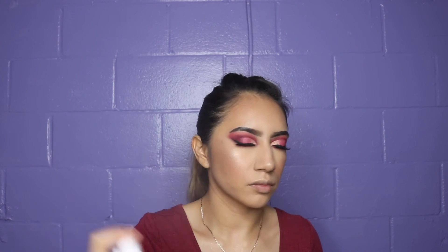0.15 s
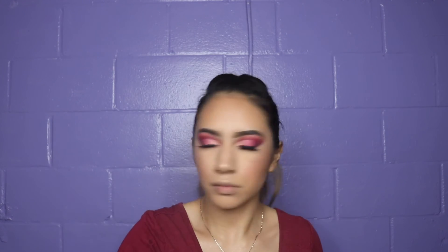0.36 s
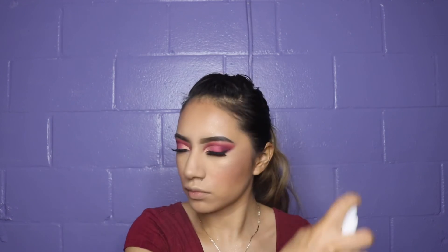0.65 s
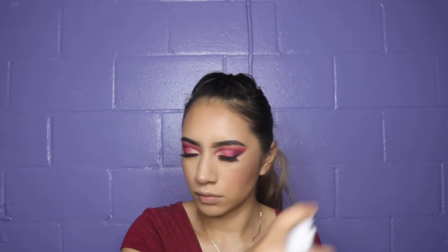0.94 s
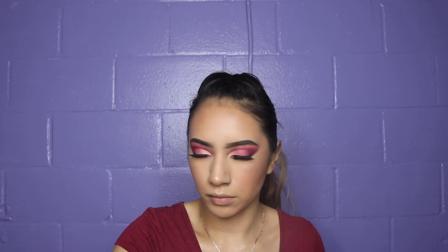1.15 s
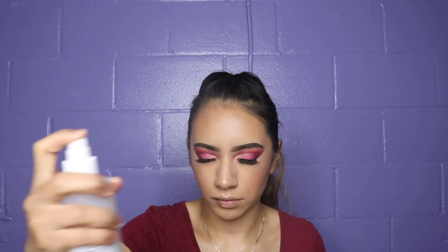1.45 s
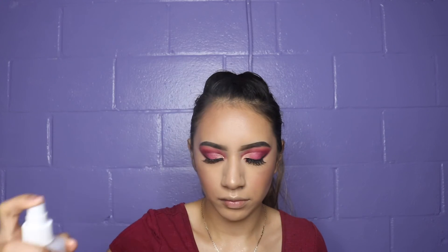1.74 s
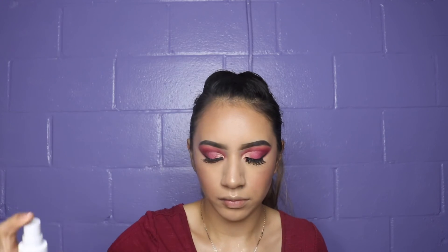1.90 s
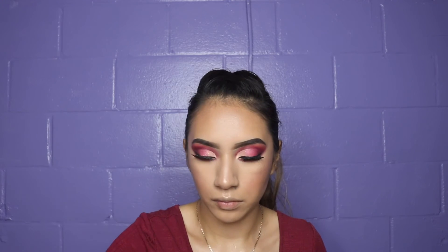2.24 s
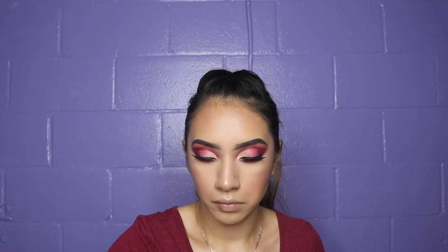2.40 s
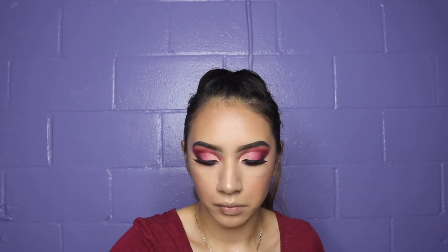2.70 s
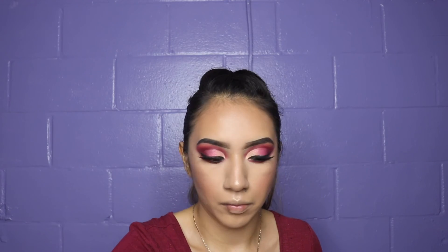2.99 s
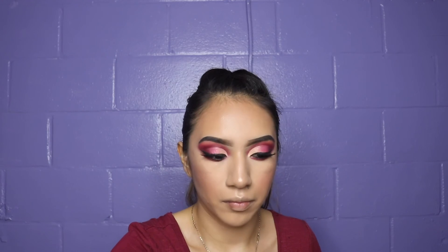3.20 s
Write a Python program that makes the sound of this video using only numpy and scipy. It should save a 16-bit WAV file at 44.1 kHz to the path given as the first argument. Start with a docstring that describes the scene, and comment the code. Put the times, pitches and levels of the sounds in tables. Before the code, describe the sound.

A small plastic spray bottle is pumped about four times a second from 0 to 1.9 s: light plunger ticks, a hollow clack, then a very short, bright hiss of mist, eight puffs in all, the first faint. From 2.0 to 2.6 s only faint taps and soft rustling. At 3.13 s the bottle lands on a table with a woody, briefly ringing knock. Close stereo, hard-walled room, faint steady appliance hum.

```python
"""A hard-walled room, close to a stereo microphone: a small pump bottle is worked about four times a second.
In each stroke the plunger ticks, the pump clacks, and the nozzle lets out a short hiss of mist.
Mist is coloured noise; clacks and ticks are short plastic rings with a noisy rattle.
After light taps and a soft rustle the bottle is set down with a knock that rings the table's modes.
An appliance hum of wavering sines and a faint noise bed run throughout."""
import sys
import numpy as np
from scipy import signal
from scipy.fft import rfft, irfft, next_fast_len
from scipy.io import wavfile
from scipy.ndimage import uniform_filter1d

SR = 44100
rng = np.random.default_rng(int(sys.argv[2]) if len(sys.argv) > 2 else 0)


def digitize_waveform(pressure):
    """Quantize a signal to 16-bit integers and store it at the path in sys.argv[1].

    Rows of a 2-D input are taken as channels; values are limited to [-1, 1].
    """
    field = np.atleast_2d(pressure).T
    bounded = np.clip(field, -1, 1)
    quanta = np.round(bounded * 32767).astype(np.int16)
    wavfile.write(sys.argv[1], SR, quanta)


N = 147735

# puffs of mist: start_s, attack_s, length_s (attack included), level_db, tilt_db_per_octave,
# left_minus_right_db, left_late_ms, nozzle_ring_db (relative to the puff)
PUFFS = [(-.03, .018, 0.054, -39, 4, 0.5, -.06, -15), (0.214, 0.0098, 0.031, -32.5, 3, -0.3, -0.071, -8),
         (0.46, 0.027, .032, -33, 2.5, -0.5, 0.029, -9.5), (0.736, 0.021, 0.026, -35.5, 3, -1, 0.071, -4),
         (.962, 0.015, 0.032, -33.5, 3.1, -1, 0.056, -4.5),
         (1.233, .011, 0.022, -32.5, 2.4, -1, -0.021, -8), (1.446, .014, 0.025, -31, 3, 1.5, -0.059, -5),
         (1.688, .019, 0.03, -31.5, 2.9, 2.5, -0.1, -1)]
# colour of the jet's hiss: pitch_hz, level_db
MIST_COLOUR = [(200, -32), (700, -2.5), (1300, 3.5), (2200, 8), (3100, 5.5), (4000, 4), (5100, -0.5),
               (6700, -1), (9800, -3.5), (11400, -10.5), (12200, -10), (14000, -14), (16000, -17.5)]
# ring of the nozzle: pitch_hz, level_db
NOZZLE_COLOUR = [(3500, -19), (5200, -13), (5650, 0), (6100, -4), (6600, -12), (9000, -43)]
# duller rush while pressure builds: pitch_hz, level_db
RUSH_COLOUR = [(200, -28), (600, -4), (1400, 7.5), (2600, -36.5), (4000, -2.5), (12000, -5)]
# pump clacks as the plunger is pressed: start_s, level_db, tilt_db_per_octave, left_minus_right_db, left_late_ms
CLACKS = [(0.1906, -31.5, 0, -2.5, -0.076), (.4407, -28.5, 3, -4, -0.012), (0.7126, -27, 0.5, -3, .06),
          (0.9345, -30, -0.5, -2.5, 0.074), (1.185, -30, 0.5, -2, 0.045), (1.4126, -30, 0.5, -0.5, -0.07),
          (1.6577, -31.5, 0, -1.4, -0.092)]
# ring of the pump head: pitch_hz, level_db
CLACK_COLOUR = [(100, -31.5), (300, -2), (520, -8), (680, 0), (820, -5), (1500, -1), (1850, -5), (2500, 5),
                (2850, -2), (3250, -12), (4300, -11.5), (5000, -18), (5700, -14), (6700, -32.5),
                (15000, -46)]
# plunger ticks as the spring returns and the finger takes up the slack: start_s, level_db, tilt_db_per_octave
TICKS = [(.073, -39, -1.5), (.105, -39, -0.5), (.141, -37.5, 1.5), (.181, -42.5, 0.5), (0.3265, -42, 1.5),
         (0.354, -39, 1.5), (.381, -36.5, 3), (.391, -40.5, -1), (0.4309, -35.5, 0), (0.5754, -40.5, 2),
         (0.608, -39, 1), (0.6303, -35.5, 1), (.639, -35, 3), (.702, -39.5, 3), (.834, -43.5, 1.5),
         (0.865, -41, 1.5), (.888, -38, 1.5), (.926, -46, 2.5), (1.0753, -41, 2), (1.112, -38, 1),
         (1.1363, -36, .5), (1.175, -43, -2), (1.3421, -38, 1.5), (1.365, -35, 2.5), (1.375, -41.5, 9),
         (1.404, -42.5, -2), (1.556, -47, 1.5), (1.59, -37.5, 0.5), (1.620, -39.5, -0.5), (1.649, -44, 0),
         (1.805, -48, -0.5), (1.843, -38.5, 0), (1.872, -38.5, 0.5), (1.881, -43, 4.5),
         (1.897, -47.5, 11.5)]
# ring of the bottle under a tick: pitch_hz, level_db
TICK_COLOUR = [(100, -18.5), (320, 7), (420, 3), (560, 3), (680, 5.5), (820, 2), (1100, -3), (1600, -1),
               (1950, -4.5), (2650, -3), (3400, -19.5), (4600, -17.5), (5700, -13.5), (6800, -23),
               (15000, -45)]
# small handling taps: start_s, level_db, pitch_hz
TAPS = [(2.007, -48, 880), (2.099, -47, 2350), (2.105, -47.5, 2350), (2.107, -49, 3350), (2.33, -50, 1230)]
# soft rustles: start_s, length_s, level_db, left_minus_right_db, tilt_db_per_octave
RUSTLES = [(2.08, 0.046, -54, -12.5, 2), (2.139, 0.17, -54, -7, 4.5), (2.314, 0.073, -56, -4, -1),
           (2.412, 0.15, -60, -2, 4), (3.316, 0.1, -56, 8, 8)]
# colour of the rustle: pitch_hz, level_db
RUSTLE_COLOUR = [(400, 8), (2300, 15), (4000, 7), (7000, 5.5), (10000, 1), (15000, -19)]
# contacts of the bottle set down on the table: start_s, crack_db, thump_db (both relative)
KNOCKS = [(3.134, 1, 0), (3.1395, -8, -11.5), (3.1447, -14, -1)]
# modes of table and bottle: pitch_hz, level_db, t60_s
TABLE_MODES = [(176.2, -33.5, 0.37), (188, -32.5, 0.21), (279.8, -23.5, 0.19), (301, -33, 0.095),
               (436.6, -33.5, 0.35), (547, -42, 0.24), (593, -37, 0.34), (705, -51, .2), (978, -37.5, 0.4),
               (1092, -40.5, 0.35), (1580, -52.5, 0.37), (2680, -50, 0.13), (3100, -34, 0.049),
               (5394, -48, 0.1), (7780, -46, 0.071)]
# colour of the landing crack: pitch_hz, level_db
CRACK_COLOUR = [(25, -39), (60, -4), (200, 6.5), (500, 5), (800, 4.5), (1400, -5.5), (2600, -1.5),
                (3200, -1.5), (3750, -10), (5300, -7), (6400, -15), (7900, -15), (9200, -23), (15000, -41)]
# delay of the table-top echo, before the hand's sway: left_s, right_s
ECHO_S = [.0044, .0042]
# reverberation: pitch_hz, t60_s, level_db
ROOM = [(150, 0.58, 2), (493, 0.3, 1), (1470, 0.54, 2.5), (3700, .38, 1), (8200, 0.3, 3.5), (15800, .25, 2)]
# stereo width of room tone and reverberation: pitch_hz, side_minus_mid_db
WIDTH = [(60, -8), (300, -5.5), (800, -6), (2000, 0), (15000, 1)]
# appliance hum lines: pitch_hz, level_db
HUM = [(58.4, -58), (93.5, -66), (118.3, -69), (236, -68.5), (351.5, -56.5), (411, -68.5), (474, -67)]
# colour of the room tone: pitch_hz, level_db
AIR_COLOUR = [(25, -29), (48, -14), (100, 1), (200, -3), (310, -5.5), (480, -4.5), (750, -8), (1000, -13.5),
              (2000, -17), (4000, -18.5), (8000, -22), (12000, -26), (15500, -32.5)]

PUFF_RELEASE_S, SPUTTER_DB = 0.0062, 2.85
RUSH_DB, RUSH_S = -20.5, 0.016
JET_SPREAD_DB = -7  # share of the jet that reaches the two microphones unrelated
HIT_S = 0.005  # time over which a hit's level is taken
CLACK_RATTLE_DB, CLACK_RATTLE_S = -5, 0.0022
TICK_RATTLE_DB, TICK_RATTLE_S = 1.5, 0.0042
TICK_VARY_DB, TICK_PAN_DB = 2.2, -1  # each tick favours other resonances
CONTACT_S = 0.00012  # time for which the plastic parts press together
TAP_SKIRT_DB, TAP_PAN_DB = -12.5, -2
CRACK_DB, CRACK_RATTLE_DB, CRACK_RATTLE_S = -26, 7, 0.0043
TABLE_RISE_S, KNOCK_PAN_DB = 0.0006, 0
MIST_ROOM_DB, PUMP_ROOM_DB, KNOCK_ROOM_DB, TABLE_ROOM_DB = -7, -5, 0, -24
NOZZLE_ROOM_DB = -3  # the nozzle's ring is beamed, so less of it reaches the walls
ROOM_BUILD_S, ECHO_DB = 0.0013, -9
HUM_WAVER_DB, HUM_WAVER_HZ = 1.1, 350  # level waver of a line at that pitch; lower lines are steadier
AIR_DB = -54.5
TOP_HZ = 15600


def undb(db):
    """Decibels to gain."""
    return 10 ** (np.asarray(db) / 20)


def curve(points, hz, axis=1):
    """Read a table column on a log-frequency axis."""
    p = np.array(points, float)
    return np.interp(np.log(np.maximum(hz, 1)), np.log(p[:, 0]), p[:, axis])


def ring(points, tilt=0, size=4096):
    """Causal (minimum-phase) response of unit energy with the given colour."""
    hz = np.fft.rfftfreq(size, 1 / SR)
    colour_db = curve(points, hz) + tilt * np.log2(np.maximum(hz, SR / size))
    cepstrum = irfft(colour_db * np.log(10) / 20)
    # folding the cepstrum forward in time puts the energy at the onset
    cepstrum[1:size // 2] *= 2
    cepstrum[size // 2 + 1:] = 0
    response = irfft(np.exp(rfft(cepstrum)))
    return response / np.linalg.norm(response)


def through(x, response):
    """Pass a sound through a response."""
    return signal.fftconvolve(x, response)[:len(x)]


def walk(rate):
    """Smooth random motion, drawing about rate new values a second."""
    k = int(SR / rate)
    steps = np.repeat(rng.standard_normal(N // k + 1), k)
    return uniform_filter1d(steps, k)[:N]


def place(x, pan_db, late_ms=0):
    """Set a source between the two microphones by level and by delay of the left."""
    size = next_fast_len(N + 256, True)
    khz = np.fft.rfftfreq(size, 1000 / SR)
    left = irfft(rfft(x, size) * np.exp(-2j * np.pi * khz * late_ms), size)[:N]
    return np.array([left * undb(pan_db / 2), x * undb(-pan_db / 2)])


def hit(at, db, body, rattle_db, rattle_s):
    """A sharp contact and a brief noisy rattle, both sounding through a body."""
    t = np.arange(len(body)) / SR
    env = np.exp(-t / rattle_s) * (1 - np.exp(-10 * t / rattle_s))
    rattle = through(rng.standard_normal(len(t)) * env, body)
    y = body + undb(rattle_db) * rattle / np.linalg.norm(rattle)
    y *= undb(db) * np.sqrt(HIT_S * SR) / np.linalg.norm(y)
    return np.concatenate([np.zeros(int(at * SR)), y, np.zeros(N)])[:N]


def mist(t):
    """A dull rush leads; the jet swells as pressure builds, rings the nozzle and dies at the end of the stroke."""
    hiss = whistle = 0
    flow = rng.standard_normal((5, N)) * undb(SPUTTER_DB * walk(400))
    spread = undb(JET_SPREAD_DB)
    for at, attack, length, db, tilt, pan_db, late, nozzle_db in PUFFS:
        swell = np.sin(np.pi / 2 * np.clip((t - at) / attack, 0, 1)) ** 2
        env = swell * np.exp(-np.maximum(t - at - length, 0) / PUFF_RELEASE_S)
        colour = ring(MIST_COLOUR, tilt)
        sides = undb(db + np.array([[pan_db], [-pan_db]]) / 2)
        jet = through(flow[0] * env, colour)
        rush = through(flow[1] * np.exp(-((t - at) / RUSH_S) ** 2), ring(RUSH_COLOUR))
        core = place(jet + undb(RUSH_DB) * rush, 0, late)
        cloud = spread * np.array([through(part * env, colour) for part in flow[2:4]])
        hiss = hiss + sides * (core + cloud) / np.hypot(1, spread)
        nozzle = undb(nozzle_db) * through(flow[4] * env, ring(NOZZLE_COLOUR))
        whistle = whistle + sides * place(nozzle, 0, late)
    return hiss, whistle


def pump():
    """Plastic clacks of the pump head and lighter ticks of the plunger, rounded by the time of contact."""
    clacks = ticks = 0
    for at, db, tilt, pan_db, late in CLACKS:
        clack = hit(at, db, ring(CLACK_COLOUR, tilt), CLACK_RATTLE_DB, CLACK_RATTLE_S)
        clacks = clacks + place(clack, pan_db, late)
    changes = TICK_VARY_DB * rng.standard_normal((len(TICKS), len(TICK_COLOUR)))
    for (at, db, tilt), vary in zip(TICKS, changes):
        colour = [(hz, level + change) for (hz, level), change in zip(TICK_COLOUR, vary)]
        ticks = ticks + hit(at, db, ring(colour, tilt), TICK_RATTLE_DB, TICK_RATTLE_S)
    push = np.sin(np.pi * np.minimum(np.arange(1, SR // 100) / SR / CONTACT_S, 1)) ** 2
    both = clacks + place(ticks, TICK_PAN_DB)
    return np.array([through(channel, push / push.sum()) for channel in both])


def taps():
    """Light touches, each with one short resonance and a sloping skirt around it."""
    total = 0
    for at, db, hz in TAPS:
        skirt = [(hz / 4, 2 * TAP_SKIRT_DB), (hz / 1.25, TAP_SKIRT_DB), (hz, 0),
                 (hz * 1.25, TAP_SKIRT_DB), (hz * 8, 4 * TAP_SKIRT_DB)]
        total = total + hit(at, db, ring(skirt), TICK_RATTLE_DB, TICK_RATTLE_S)
    return place(total, TAP_PAN_DB)


def rustle(t):
    """Soft brushing swells of coloured noise as the arm moves."""
    total = 0
    for at, length, db, pan_db, tilt in RUSTLES:
        swell = np.sin(np.pi * np.clip((t - at) / length, 0, 1))
        brush = through(rng.standard_normal(N), ring(RUSTLE_COLOUR, tilt))
        total = total + place(undb(db) * swell * brush, pan_db)
    return total


def knock(t):
    """The base of the bottle lands in quick contacts; each cracks and sets the table top ringing."""
    crack = table = 0
    for at, crack_db, thump_db in KNOCKS:
        age = np.maximum(t - at, 0)
        modes = 0
        for hz, db, t60 in TABLE_MODES:
            decay = np.exp(-np.log(1000) * age / t60)
            modes = modes + undb(db) * np.sin(2 * np.pi * hz * age) * decay
        table = table + undb(thump_db) * modes * (1 - np.exp(-age / TABLE_RISE_S))
        crack = crack + hit(at, CRACK_DB + crack_db, ring(CRACK_COLOUR), CRACK_RATTLE_DB, CRACK_RATTLE_S)
    crack = place(crack, KNOCK_PAN_DB, late_ms=-0.023)
    table = place(table, KNOCK_PAN_DB, late_ms=-0.023)
    return crack + table + room(crack, KNOCK_ROOM_DB) + room(table, TABLE_ROOM_DB)


def room(x, db, count=12):
    """Diffuse tail of the walls: noise bands, more alike on both sides in the bass, wide and shorter on top."""
    t = np.arange(SR // 2) / SR
    hz = np.fft.rfftfreq(len(t), 1 / SR)
    edges = np.geomspace(100, SR / 2, count + 1)
    mid, side = rfft(rng.standard_normal((2, len(t))))
    width = undb(curve(WIDTH, hz))
    noise = np.array([mid + width * side, mid - width * side]) / np.sqrt(1 + width ** 2)
    tail = 0
    for lo, hi in zip(edges, edges[1:]):
        centre = np.sqrt(lo * hi)
        decay = np.exp(-np.log(1000) * t / curve(ROOM, centre))
        env = decay * (1 - np.exp(-(t / ROOM_BUILD_S) ** 2))
        band = irfft(noise * ((hz >= lo) & (hz < hi)), len(t))
        tail = tail + band * env / np.linalg.norm(env) * undb(curve(ROOM, centre, axis=2))
    return undb(db) * np.array([through(channel, response) for channel, response in zip(x, tail)])


def background(t):
    """Slightly wavering hum over even room tone, narrow in the bass and wide in the treble."""
    hum = 0
    for hz, db in HUM:
        waver = np.sqrt(hz / HUM_WAVER_HZ)
        level = np.sqrt(2) * undb(db + waver * HUM_WAVER_DB * walk(7.6))
        hum = hum + level * np.sin(2 * np.pi * hz * t + 0.78 * waver * walk(6))
    hz = np.fft.rfftfreq(N, 1 / SR)
    gain = undb(curve(AIR_COLOUR, hz))
    gain *= undb(AIR_DB) / np.sqrt(np.mean(gain ** 2))
    mid, side = rfft(rng.standard_normal((2, N))) * gain
    side = side * undb(curve(WIDTH, hz))
    return hum + irfft(np.array([mid + side, mid - side]), N)


def scene():
    """Bottle, its echo off the table top, the room and the hum."""
    t = np.arange(N) / SR
    hiss, whistle = mist(t)
    handling = pump() + taps() + rustle(t)
    near = hiss + whistle + handling
    sway = 1 + 0.043 * np.sin(2 * np.pi * 0.616 * t)  # the hand moves to and fro
    bounced = [np.interp(t - delay * sway, t, channel, left=0) for channel, delay in zip(near, ECHO_S)]
    echo = undb(ECHO_DB) * np.array(bounced)
    mist_walls = room(hiss + undb(NOZZLE_ROOM_DB) * whistle, MIST_ROOM_DB)
    walls = mist_walls + room(handling, PUMP_ROOM_DB)
    return near + echo + walls + knock(t) + background(t)


def record(dry):
    """A steep low-pass; nothing sounds above TOP_HZ."""
    low_pass = signal.ellip(10, 0.2, 70, TOP_HZ, fs=SR, output="sos")
    return signal.sosfilt(low_pass, dry)


dry = scene()
out = record(dry)
digitize_waveform(out)
```